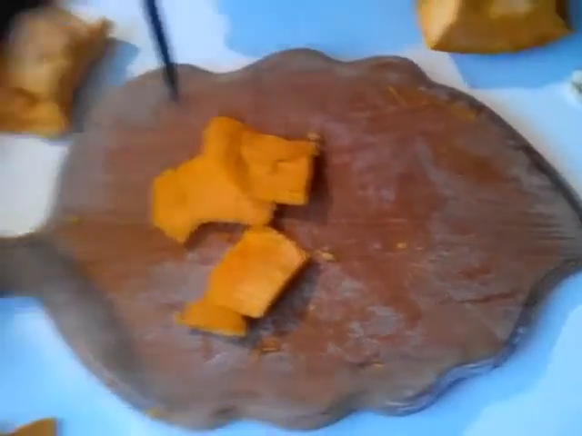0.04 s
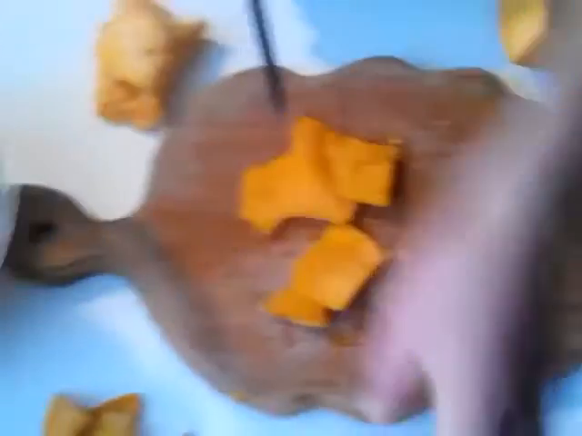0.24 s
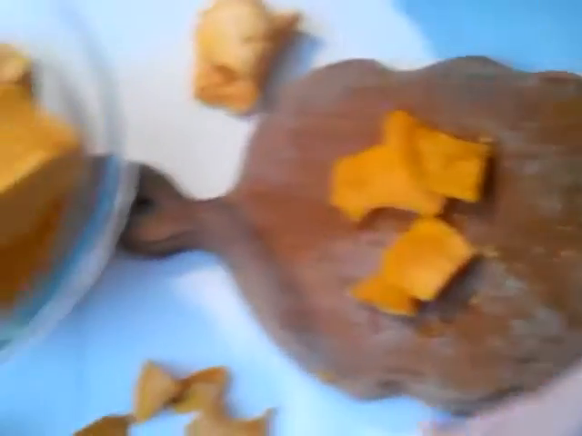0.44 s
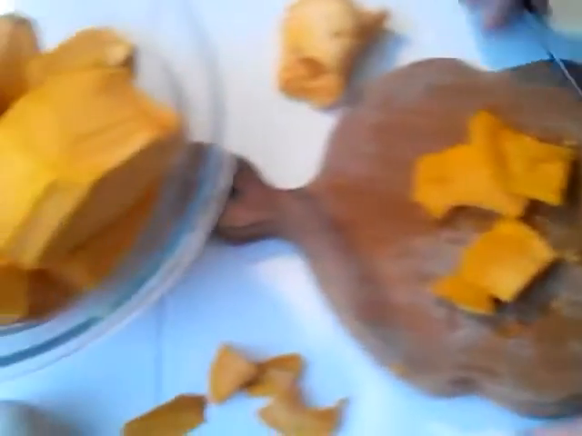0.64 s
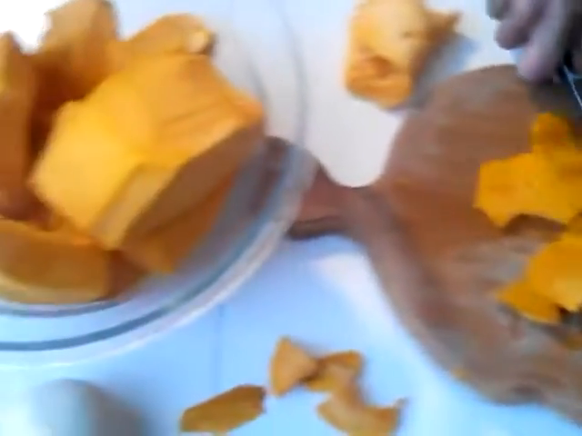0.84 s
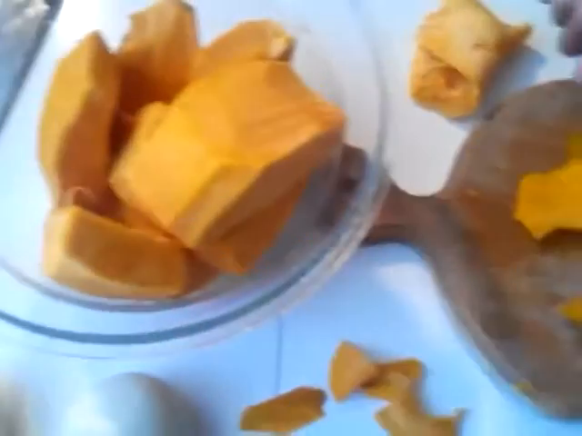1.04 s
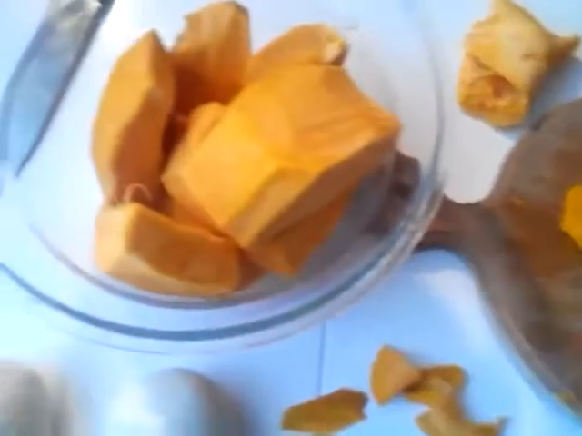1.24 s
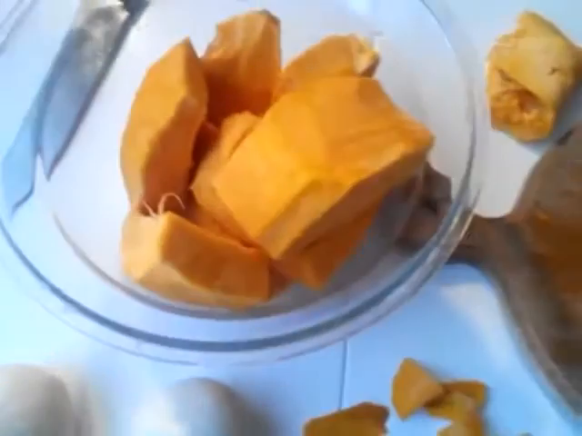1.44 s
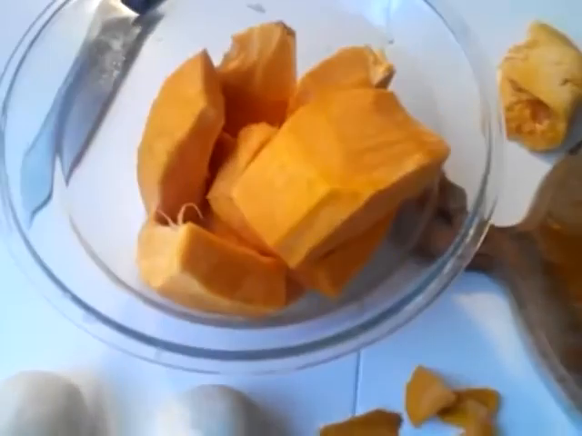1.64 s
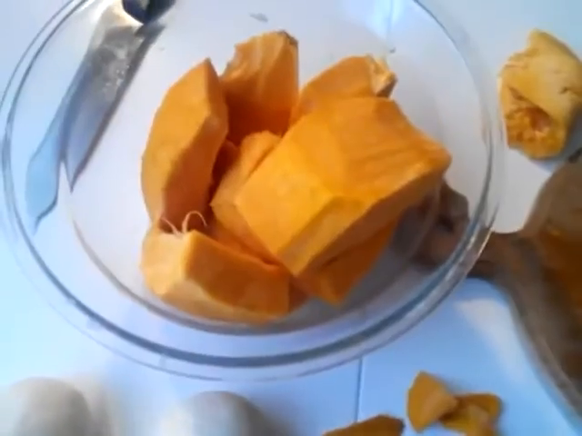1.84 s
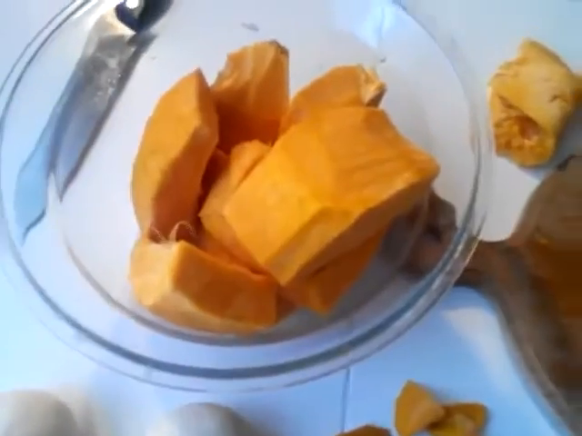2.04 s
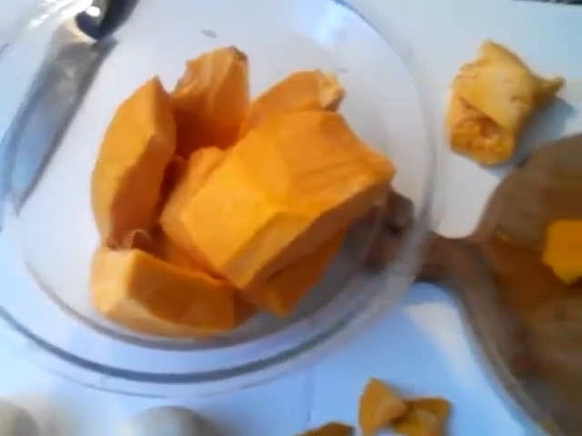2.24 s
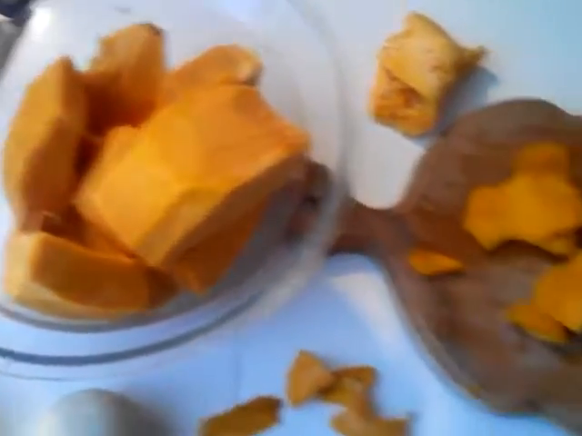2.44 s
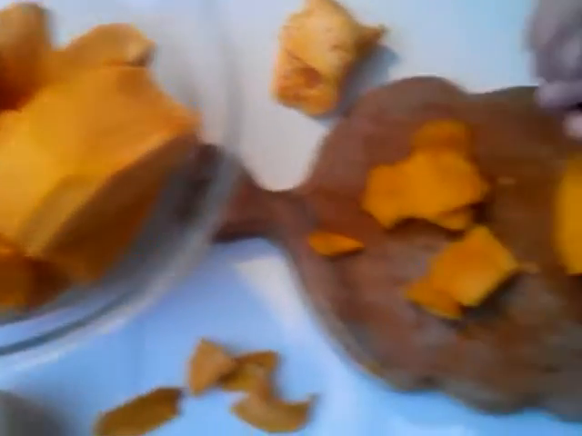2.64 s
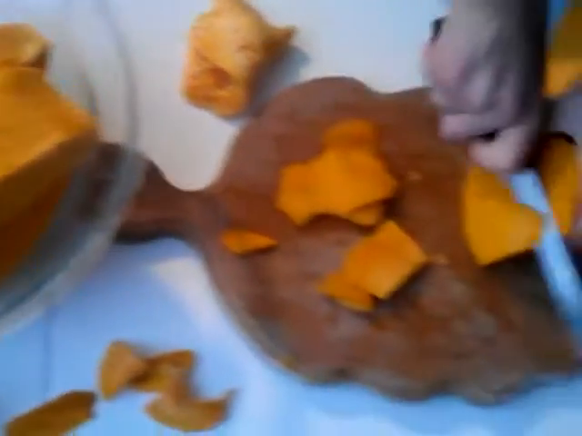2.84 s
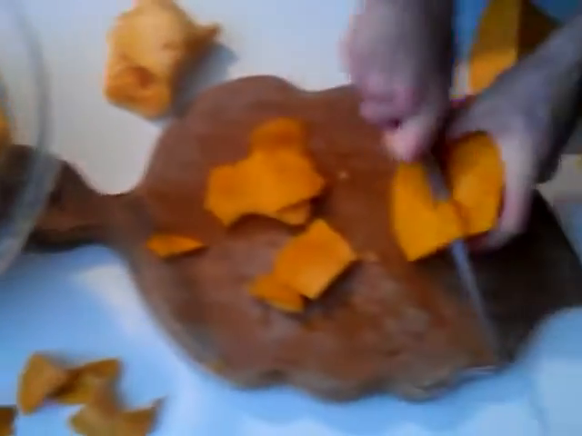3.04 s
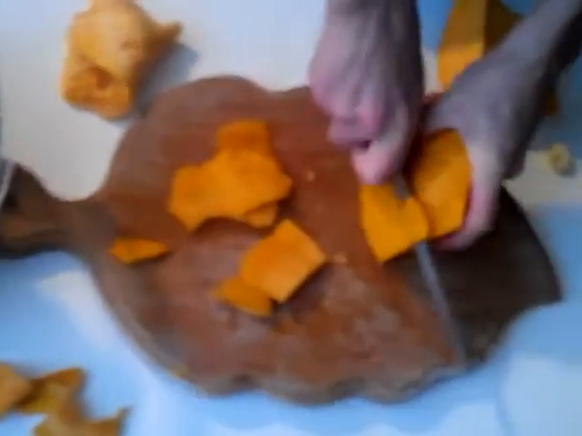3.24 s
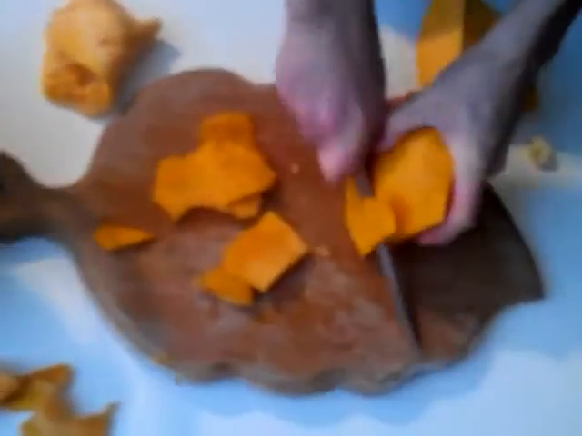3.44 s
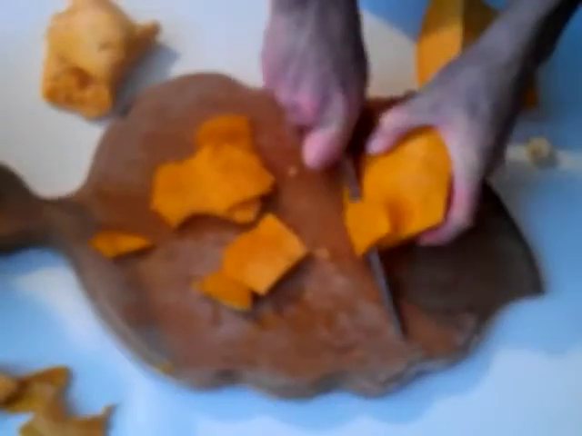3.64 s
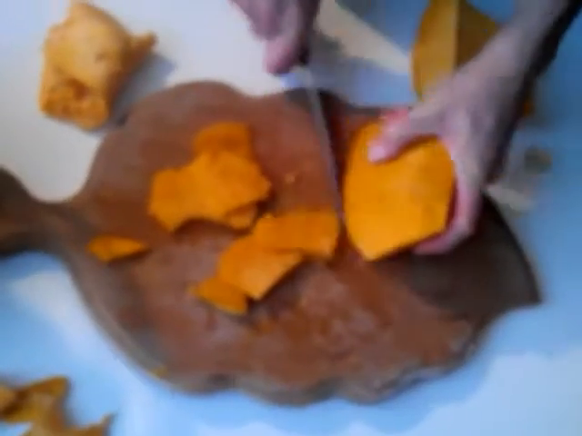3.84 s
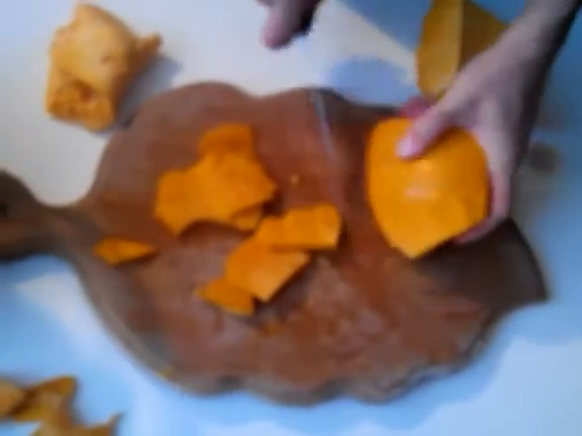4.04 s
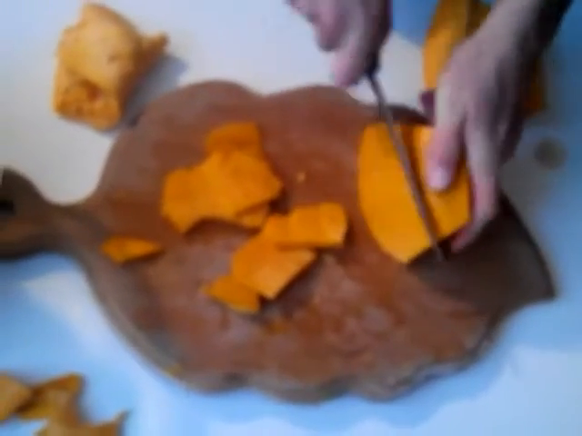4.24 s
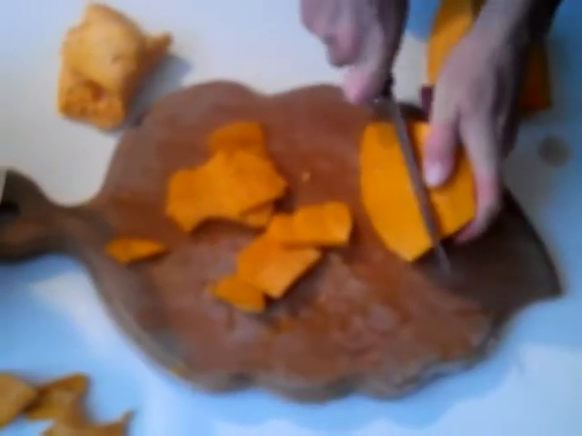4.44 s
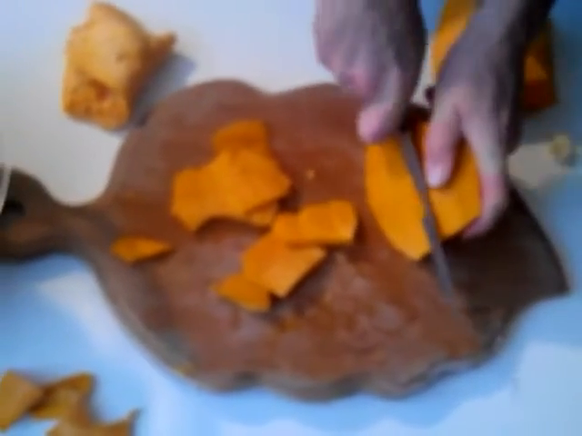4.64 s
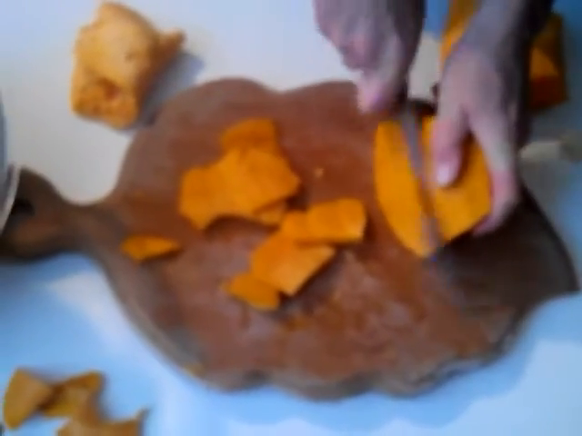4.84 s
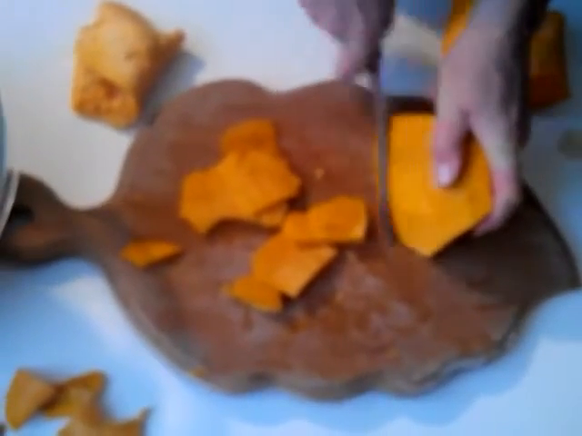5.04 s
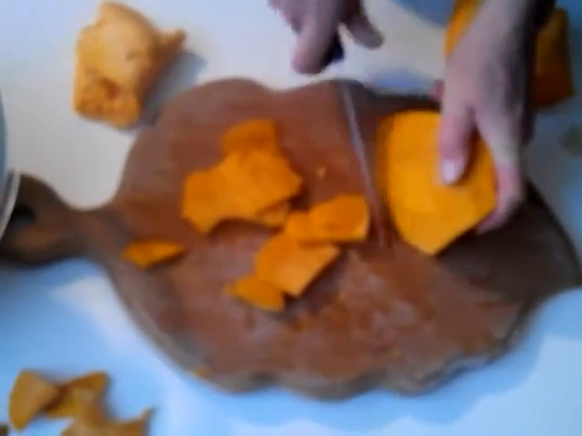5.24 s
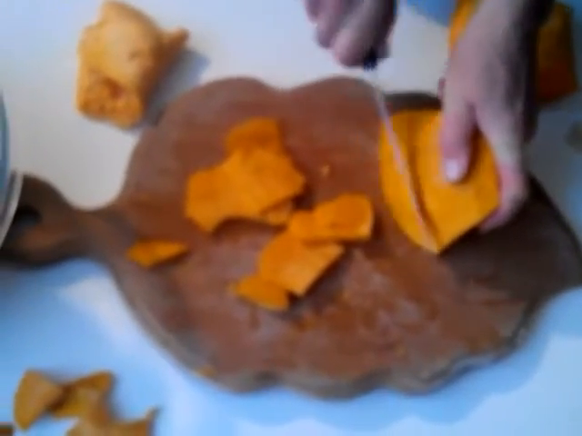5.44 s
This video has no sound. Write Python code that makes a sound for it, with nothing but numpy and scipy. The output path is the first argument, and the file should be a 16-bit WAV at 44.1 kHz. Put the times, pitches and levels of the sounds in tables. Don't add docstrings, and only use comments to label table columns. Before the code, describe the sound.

Faint hiss and low room tone run throughout, picked up by a small camera close to a wooden board in a hard, ringing kitchen. At 0.3-0.4 s a tight cluster of woody knocks and deep table thumps lands, followed by faint rubbing. At 0.95 s a hard rap bounces twice in quick succession, and a piece scrapes until about 1.25 s. After near silence, a weighty double knock comes at 1.6 s. From 2.1 s the knife ticks and crunches into firm pumpkin; at 2.45 s the hardest blow cracks and overloads. Small snaps follow at 2.6-2.7 s, light rubbing near 3 s, then short gritty rasps from 3.1 s. A crunch and hard rap hit at 3.6 s, and a loud steel-bright chop rings at 3.86 s. Softer cuts, a thump at 4.37 s and quick rasps around 4.9 s lead to a last crunch and loud double crack at 5.2 s, its echo fading.

```python
import sys
import numpy as np
from scipy import signal
from scipy.fft import rfft, irfft, next_fast_len
from scipy.io import wavfile

SR = 44100
rng = np.random.default_rng(int(sys.argv[2]) if len(sys.argv) > 2 else 0)


def master_out(mix):
    frames = np.transpose(np.atleast_2d(mix))
    ceiling = np.clip(frames, -1, 1)
    pcm = np.round(ceiling * 32767).astype(np.int16)
    wavfile.write(sys.argv[1], SR, pcm)


def ratio_of_db(decibels):
    return 10 ** (np.asarray(decibels, float) / 20)


N = 242550


def unit(x):
    return x / np.sqrt(np.mean(x ** 2) + 1e-20)


def add(track, start_s, sound):
    place = track[round(start_s * SR):][:len(sound)]
    place += sound[:len(place)]


def along(points, hz):
    point_hz, value = np.transpose(points)
    return np.interp(np.log(hz + 1), np.log(point_hz + 1), value)


def filtered(x, response):
    m = next_fast_len(len(x) + 8192)
    return irfft(rfft(x, m) * response(np.fft.rfftfreq(m, 1 / SR)), m)[:len(x)]


def colored(x, spectrum):
    return unit(filtered(x, lambda f: ratio_of_db(along(spectrum, f))))


def resonances(modes, f):
    total = 0
    for k, (hz, width_hz, db) in enumerate(modes):
        total = total + (-1) ** k * ratio_of_db(db) * 1j * f * width_hz / (hz * hz - f * f + 1j * f * width_hz)
    return total


def dull(f, top_hz):
    return 1 / (1 + 1j * f / top_hz) ** 2


# pitch_hz, t60_s
ROOM_DECAY = [(120, 0.44), (300, 0.59), (1000, 0.47), (2000, 0.41), (4500, 0.38), (7500, 0.25)]


def kitchen(x):
    gap_s, early_db, early_s = 0.0013, -3, 0.14
    hz, t, z = signal.stft(rng.standard_normal(SR // 2), SR, nperseg=256)
    decay = ratio_of_db(-60 * t / along(ROOM_DECAY, hz)[:, None])
    tail = signal.istft(z * decay, SR, nperseg=256)[1]
    t = np.arange(len(tail)) / SR
    early = 1 + ratio_of_db(early_db - 60 * t / early_s)
    tail = tail * early * np.clip(t / gap_s - 1, 0, 1)
    return signal.fftconvolve(x, tail / np.linalg.norm(tail))


# pitch_hz, level_db
HISS_SPECTRUM = [(24, -37.5), (40, -15.5), (151, -8), (367, -13), (438, -10), (598, -14), (872, -13.5),
                 (1090, -17), (1330, -14.5), (2640, -18), (7000, -22.5), (8000, -22.5), (10400, -58.5),
                 (17600, -120)]


def hiss():
    return ratio_of_db(-60.5) * colored(rng.standard_normal(N), HISS_SPECTRUM)


# pitch_hz, level_db, t60_s
TABLE_MODES = [(64, -18, 0.044), (90, -4.5, 0.13), (129, 2.5, 0.1), (160.5, 5.5, 0.16), (178, -3, .3),
               (210.5, -9.5, 0.44), (244.7, 2.66, 0.26), (302.5, 1, 0.12), (354.6, -9, 0.36),
               (387.4, -12.5, 0.31), (500, -15, 0.18)]
# start_s, level_db (peak), pitch_hz (loudest mode)
SETTLES = [(.345, -14.5, 263), (.355, -11, 246), (.375, -16.5, 128.4), (.365, -19.5, 347), (.412, -19, 195),
           (.95, -28, 248), (1.617, -9, 149), (1.622, -16, 347), (2.856, -31, 151), (3.001, -31.5, 94),
           (3.143, -28, 140), (3.219, -25.5, 176), (4.021, -25.5, 214), (4.547, -31.5, 281),
           (5.165, -20, 168), (5.225, -20.5, 398)]
# start_s, level_db (peak), pitch_hz (loudest mode)
PATS = [(.321, -18.5, 132.7), (.499, -27.5, 177), (.774, -26.5, 140), (1.848, -27.5, 141),
        (1.987, -36, 143), (2.139, -41.5, 153.2), (4.244, -43, 133), (4.369, -19, 136), (4.45, -30, 118.7),
        (4.49, -38.5, 163.4), (4.654, -41, 137), (5.03, -41.5, 94.2), (5.129, -31.5, 91.6)]
# start_s, level_db (peak), pitch_hz (loudest mode)
JOLTS = [(2.33, -38, 292), (2.367, -27, 178), (2.419, -26, 283), (2.4485, -5, 255), (2.455, -17, 500),
         (2.772, -24, 274), (3.179, -24.5, 302), (3.382, -25, 296.5), (3.486, -36, 95), (3.617, -25, 121.6),
         (3.638, -12, 287), (3.86, -9, 303.7), (4.835, -34.5, 306), (4.888, -33.5, 300), (5.025, -39, 286),
         (5.193, -12.5, 296)]


def thump(level_db, loudest_hz, low_db, high_db, contact_ms, decay):
    t = np.arange(SR // 2) / SR
    hz, mode_db, t60_s = np.transpose(TABLE_MODES)[:, :, None]
    level_chance, pitch_chance, phase_chance = rng.standard_normal((3, len(TABLE_MODES), 1))
    push_db = np.where(hz < 200, low_db, high_db)
    gain = ratio_of_db(mode_db + 3.3 * level_chance + push_db - 60 * t / (t60_s * decay))
    detuned_hz = hz * (1 + 0.0088 * pitch_chance)
    ring = (gain * np.sin(2 * np.pi * detuned_hz * t + 0.7 * phase_chance)).sum(0)
    ring += ratio_of_db(8.5 - 60 * t / (0.15 * decay)) * np.sin(2 * np.pi * loudest_hz * t)
    rise = (1 - np.exp(-t / (contact_ms / 1000 + 1e-4))) ** 2
    return ratio_of_db(level_db - 17) * rise * ring


def thumps():
    kinds = ((SETTLES, dict(low_db=2.23, high_db=0.6, contact_ms=1.21, decay=0.91)),
             (PATS, dict(low_db=3, high_db=-6.5, contact_ms=1.5, decay=0.99)),
             (JOLTS, dict(low_db=-3, high_db=-0.9, contact_ms=1.5, decay=1.14)))
    out = np.zeros(N)
    for events, push in kinds:
        for start_s, level_db, loudest_hz in events:
            add(out, start_s - 0.002, thump(level_db, loudest_hz, **push))
    return out + ratio_of_db(-7.0) * kitchen(out)[:N]


# start_s, level_db (peak), pitch_hz, room_db
TICKS = [(.319, -35.5, 3870, -2.5), (.908, -43.5, 2100, -4), (1.254, -41, 1635, -14),
         (2.143, -43.5, 6450, -4), (2.145, -38.5, 2360, -1.5), (2.21, -40.5, 6200, -10),
         (2.313, -26, 6340, -2), (2.317, -26.5, 2300, -3.5), (2.325, -35, 6500, -13),
         (2.35, -19.5, 6300, -13), (2.355, -24.5, 6270, -7), (2.614, -21, 1350, -7.5),
         (2.720, -24, 1474, -7.5), (2.724, -27.5, 1880, -7), (2.853, -57, 2000, 5),
         (3.329, -42.5, 6050, -10), (3.346, -36, 5500, -18), (3.405, -24.5, 4800, -5),
         (3.438, -25, 6000, -14), (3.601, -37, 5500, -1.5), (3.771, -33.5, 6000, -7),
         (3.787, -23, 5500, -11), (3.7883, -26, 2320, -8), (4.170, -27.5, 1483, -7.5),
         (4.171, -34, 2200, -22), (4.372, -44, 1300, -2), (4.825, -46, 1580, 6), (5.03, -44.5, 2500, 12),
         (5.1504, -18, 5340, 6)]


def ticks():
    out, t = np.zeros(N), np.arange(SR // 40) / SR
    for start_s, level_db, hz, room_db in TICKS:
        snap = (t == 0) + 0.05 * rng.standard_normal(len(t)) * ratio_of_db(-60 * t / 0.0082)
        ring = filtered(snap, lambda f: resonances([(hz, 0.3 * hz, 0)], f) ** 2)
        dry = ratio_of_db(level_db) * ring / np.abs(ring).max()
        add(out, start_s - 0.0003, dry)
        add(out, start_s, ratio_of_db(room_db) * kitchen(dry))
    return out


def grit(rate, spread_db, life_s):
    strength = ratio_of_db(spread_db * np.minimum(rng.exponential(size=N), 2.4))
    tears = (rng.random(N) < rate / SR) * strength
    bumps = signal.lfilter([1], [1, -np.exp(-1 / (life_s * SR))], tears)
    return rng.standard_normal(N) * (0.55 + unit(bumps))


# pitch_hz, width_hz, level_db
WOOD = [(480, 200, 4), (1037, 134, 7)]
# pitch_hz, level_db
RASP = [(290, -51), (500, -26), (797, -24.5), (994, -10.5), (1260, -16), (1570, -5.5), (1810, -11),
        (3300, -24), (4290, -31.5), (7260, -120)]
# pitch_hz, level_db
SLIDE = [(1650, -31), (2800, -8), (3160, -2), (4120, 11), (5930, 6), (7700, -9), (8200, -29), (10700, -64),
         (18000, -120)]
# pitch_hz, level_db
CRUNCH = [(1650, -28.5), (2800, -10), (4310, -5), (5110, 1.5), (5650, -3.5), (6180, -1), (7010, -10.5),
          (8200, -19), (10700, -51), (18000, -120)]
# start_s, hold_s, rasp_db, crunch_db, rumble_db
CUTS = [(0.507, .25, -64.5, -59, -68), (0.774, 0.13, -64, -62.5, -48), (0.914, 0.011, -53.5, -63, -41),
        (0.994, 0.048, -39.5, -61, -43), (1.04, 0.064, -41.5, -51, -44), (1.128, 0.13, -49.5, -63.5, -43.5),
        (2.14, 0.12, -57, -62.5, -58.5), (2.314, 0.11, -42, -39, -39), (3.136, .08, -32, -35, -33),
        (3.26, .1, -47, -54, -43.5), (3.388, 0.031, -30, -39.5, -29.5), (3.608, .028, -28, -22.5, -32),
        (3.749, 0.047, -41.5, -42.5, -43.5), (4.013, 0.036, -35.5, -33, -32.5),
        (5.028, 0.061, -50.5, -55.5, -46), (5.152, 0.05, -31.5, -31.5, -30.5)]
# peak_s, slope_s (rise and fall), rasp_db, crunch_db, rumble_db
SWEEPS = [
    (2.864, 0.16, -53, -60, -45),
    (3.036, .11, -48.5, -54.5, -39),
    (4.1, .07, -66, -48, -48.5),
    (4.326, 0.18, -54.5, -61.5, -48),
    (4.718, 0.099, -53, -62.5, -45),
    (4.84, 0.036, -42.5, -55, -40),
    (4.892, 0.036, -31.5, -38, -36),
]


def strokes():
    t, gains = np.arange(N) / SR, np.zeros((3, N))
    bite_s, let_go_s, fade_db = 0.0052, 0.039, 20
    cutting_s = 2
    shapes = [(s, s + hold_s, bite_s, let_go_s, db) for s, hold_s, *db in CUTS]
    shapes += [(s, s, slope_s, slope_s, db) for s, slope_s, *db in SWEEPS]
    for start_s, end_s, rise_s, fall_s, levels_db in shapes:
        away = np.maximum(np.maximum((start_s - t) / rise_s, (t - end_s) / fall_s), 0)
        gains += np.outer(ratio_of_db(np.array(levels_db)), ratio_of_db(-fade_db * away))
    torn = grit(rate=900, spread_db=3.5, life_s=0.00077)
    rasp = colored(torn, RASP)
    edge = np.where(t < cutting_s, colored(torn, SLIDE), colored(torn, CRUNCH))
    body = [(hz, 45, db) for hz, db, _ in TABLE_MODES[2:]] + [(WOOD[0][0], 120, -5)]
    shaking = grit(rate=30, spread_db=8.0, life_s=0.0081)
    rumble = unit(filtered(shaking, lambda f: resonances(body, f)))
    dry = (gains * [rasp, edge, ratio_of_db(-2.5) * rumble]).sum(0)
    return ratio_of_db(-5.0) * dry + ratio_of_db(-12.0) * kitchen(dry)[:N]


# pitch_hz, width_hz, level_db
BOARD_RING = [(1330, 180, -6.5), (2236, 330, 0), (2630, 340, -9.5)]
# pitch_hz, width_hz, level_db
STEEL = [(3360, 1400, -3), (4130, 1200, 10), (4900, 2800, 4.5), (5250, 1200, -4), (7220, 4900, -19.5)]
# start_s, level_db (peak), pitch_hz (ring), steel_db, room_db
KNOCKS = [(.333, -15.5, 2110, -7, 0), (.3451, -7, 2030, -11.5, -7), (.3675, -13.5, 2070, -15.5, -5),
          (.4136, -14.5, 1990, -15, -7), (1.6168, -19.5, 1466, -17, 3.5), (1.624, -10.5, 2100, -11, -2),
          (2.4518, 0, 1710, -24, 1), (3.1482, -35.5, 1570, -3, -8), (3.218, -22.5, 2140, -6.5, -3),
          (3.226, -51, 1570, 0, -18), (3.6162, -14, 1127, -11, 7), (4.883, -22, 1870, -6.5, -7.5)]
# start_s, level_db (peak), pitch_hz (ring), steel_db, room_db
RAPS = [
    (.9503, 1.5, 2056, -17, -10.5),
    (.9605, -8.5, 1790, -16, -9.5),
    (.972, -8.5, 1688, -22.5, -7),
    (2.4466, 11, 2085, -22.5, -11.5),
    (3.6388, 3.5, 2063, -10.5, -5.5),
]
# start_s, level_db (peak), pitch_hz (ring), steel_db, room_db
CHOPS = [
    (3.135, -49, 1620, -2, -1),
    (3.389, -34.5, 1470, 8.5, -13.5),
    (3.648, -13.5, 1773, -3, -5.5),
    (3.8557, -23.5, 1690, 6, 3),
    (3.861, 3, 2057, -2, 3),
    (4.015, -23.5, 2550, -1.5, 3),
    (5.157, -17.5, 2150, -8, 8),
    (5.1934, 0.5, 1330, -2, -1.5),
    (5.1957, -6.5, 2016, -5.5, 11),
]


def blows():
    kinds = ((KNOCKS, dict(wood_db=-7.5, width_hz=561.5, lag_s=0, core_hz=4499, span_hz=5500)),
             (RAPS, dict(wood_db=-28.5, width_hz=559.5, lag_s=0, core_hz=4401, span_hz=1199.5)),
             (CHOPS, dict(wood_db=-16.5, width_hz=478, lag_s=0.0003, core_hz=5250, span_hz=4199)))
    out = np.zeros(N)
    for events, kind in kinds:
        for event in events:
            blow(out, *event, **kind)
    return out


def blow(out, start_s, level_db, hz, steel_db, room_db, wood_db, width_hz, lag_s, core_hz, span_hz):
    t = np.arange(SR // 20) / SR
    click = 1. * (t == 0)

    def part(db, response):
        sound = filtered(click, response)
        return ratio_of_db(level_db + db) * sound / np.abs(sound).max()

    struck = part(-3, lambda f: resonances([(hz, width_hz, 0)], f) ** 2)
    board = part(-5, lambda f: resonances(BOARD_RING, f) * dull(f, top_hz=2600))
    wood = part(wood_db, lambda f: resonances(WOOD, f) * dull(f, top_hz=1300))
    steel = part(steel_db, lambda f: resonances(STEEL, f) * resonances([(core_hz, span_hz, 0)], f))
    low = struck + board + wood
    body = np.roll(low, round(lag_s * SR)) + steel
    chatter = click + 0.22 * rng.standard_normal(len(t)) * ratio_of_db(-60 * t / 0.016)
    add(out, start_s - 0.0003, ratio_of_db(-4.5) * signal.fftconvolve(chatter, body))
    add(out, start_s, ratio_of_db(room_db + 0.5) * kitchen(low))
    add(out, start_s, ratio_of_db(room_db + 2.0) * kitchen(steel))


def scene():
    return (hiss() + thumps() + ticks() + strokes() + blows())[None]


def low_pass(x):
    return signal.sosfilt(signal.butter(12, 16520, fs=SR, output="sos"), x)


def record(dry):
    bass_hz, top_hz, clip_knee = 46, 7743, 14

    def microphone(f):
        low_cut = (1j * f / bass_hz / (1 + 1j * f / bass_hz)) ** 2
        return low_cut / (1 + (f / top_hz) ** 44)

    narrow = filtered(dry[0], microphone)
    clipped = narrow / (1 + np.abs(narrow) ** clip_knee) ** (1 / clip_knee)
    return low_pass(clipped[None])


dry = scene()
out = record(dry)
master_out(out)
```